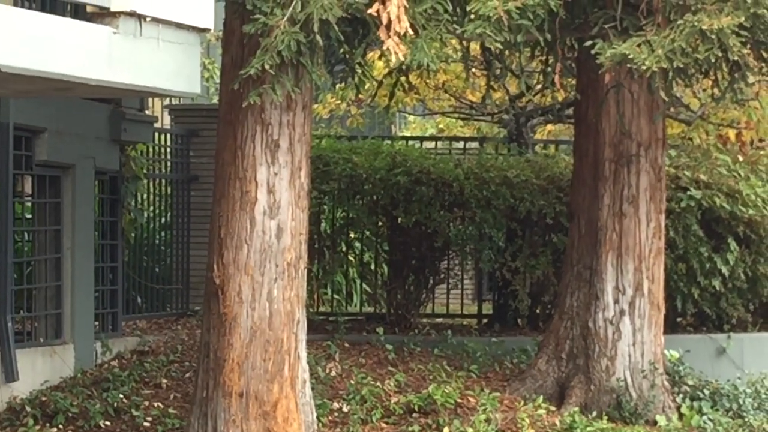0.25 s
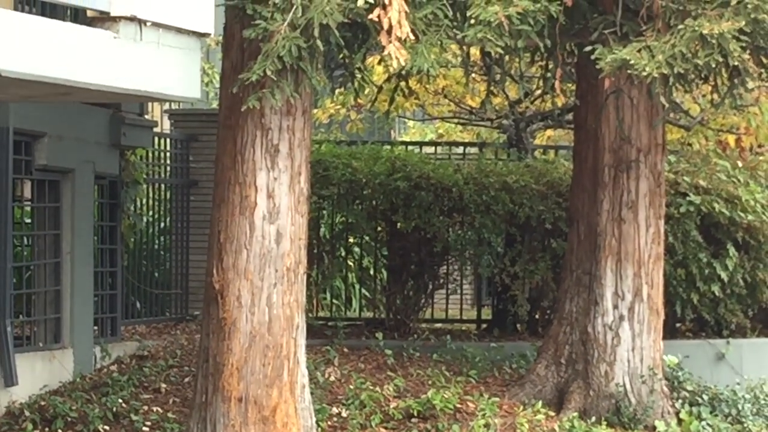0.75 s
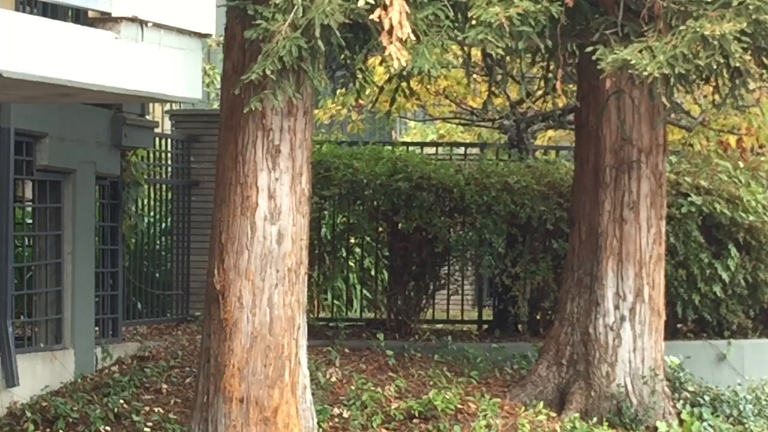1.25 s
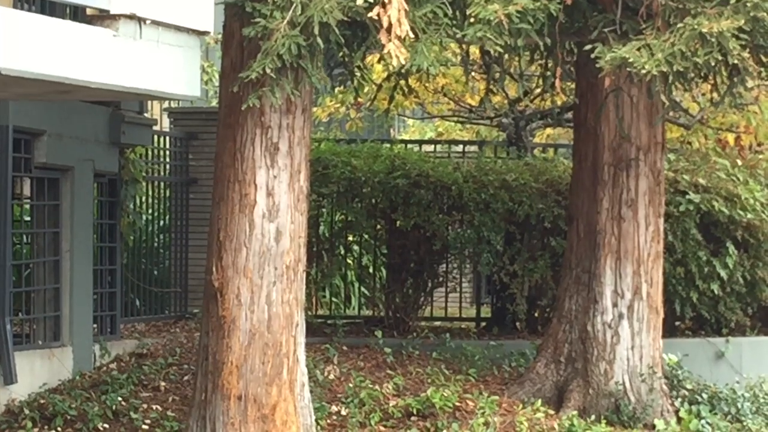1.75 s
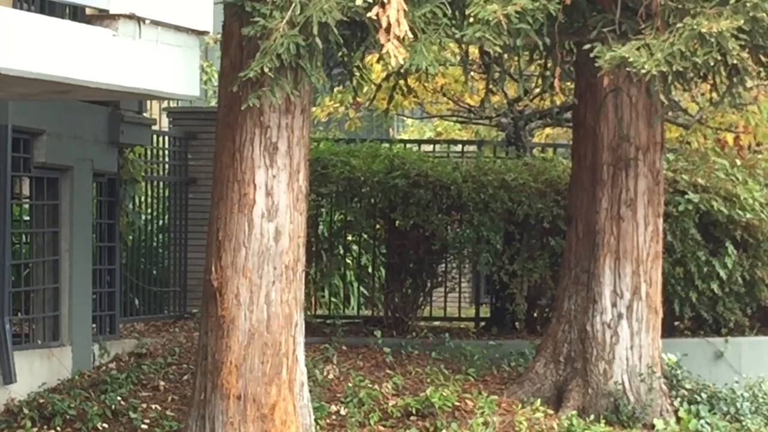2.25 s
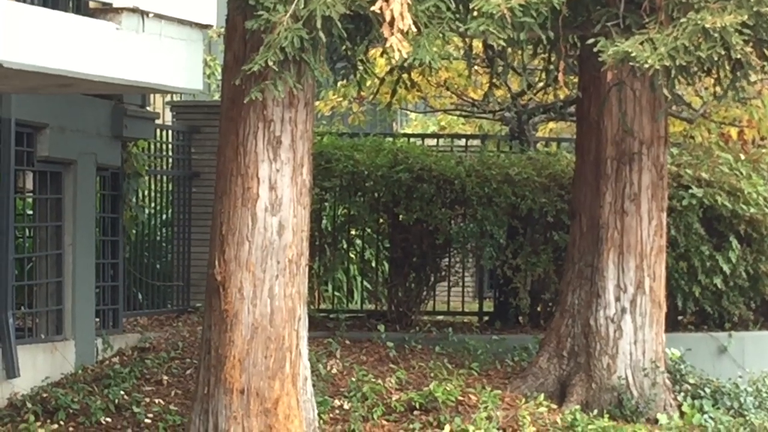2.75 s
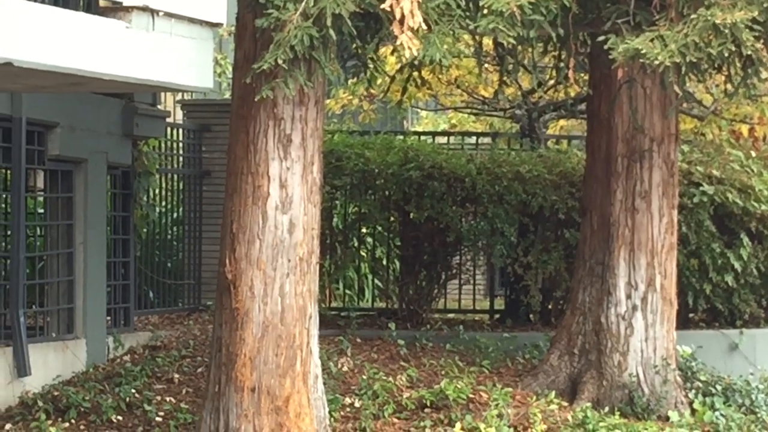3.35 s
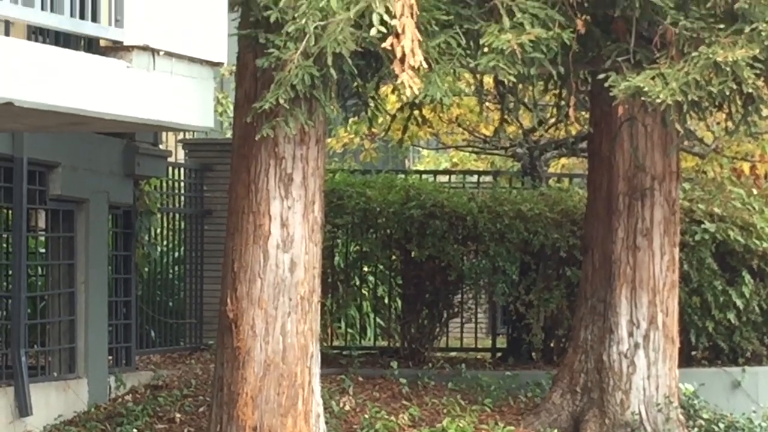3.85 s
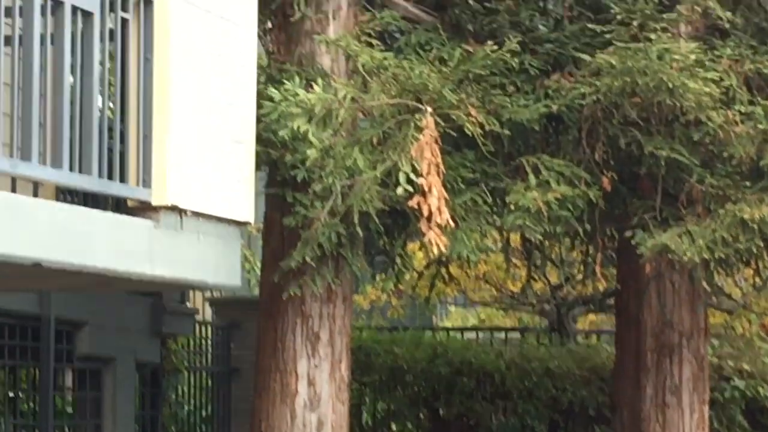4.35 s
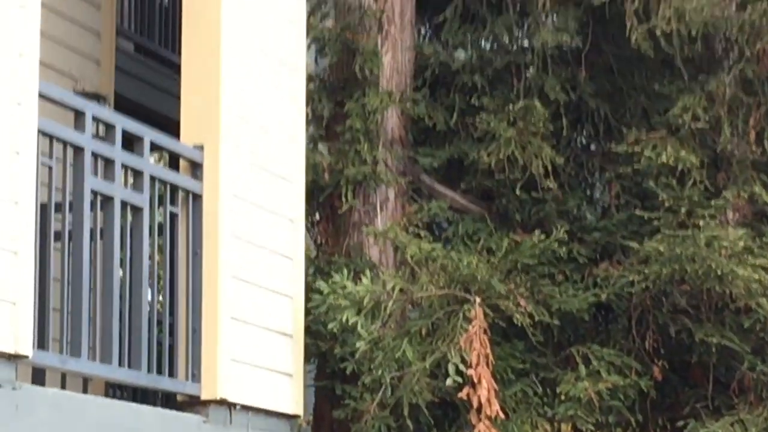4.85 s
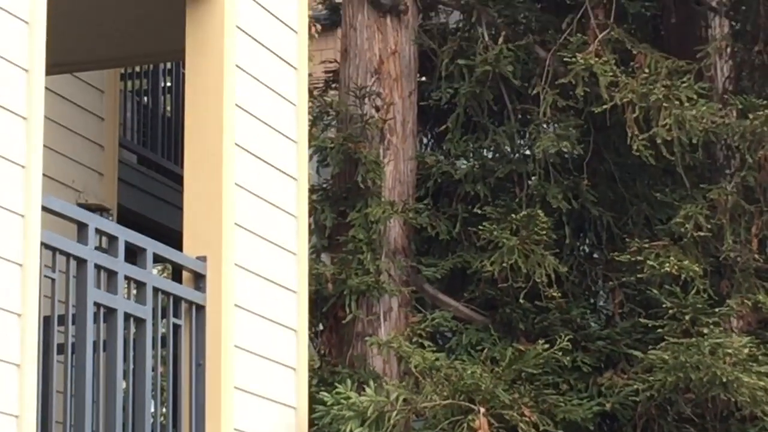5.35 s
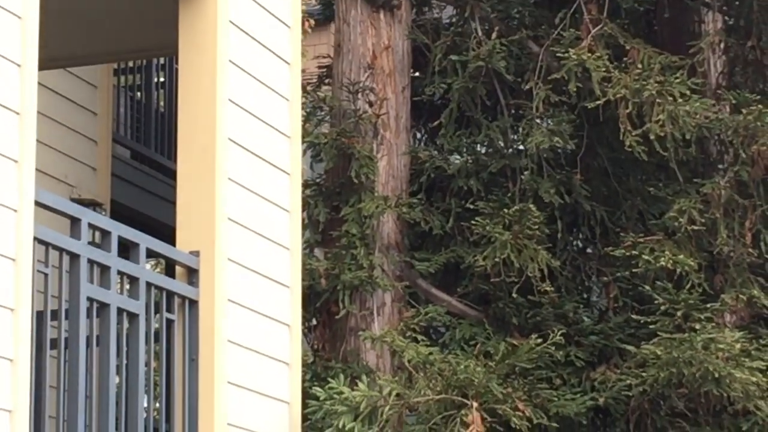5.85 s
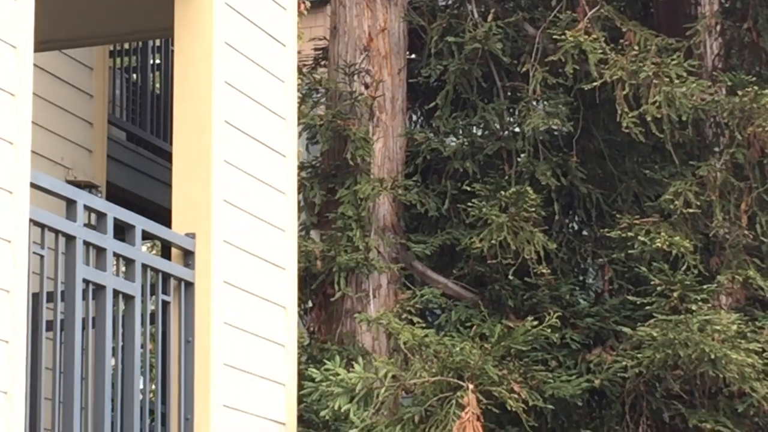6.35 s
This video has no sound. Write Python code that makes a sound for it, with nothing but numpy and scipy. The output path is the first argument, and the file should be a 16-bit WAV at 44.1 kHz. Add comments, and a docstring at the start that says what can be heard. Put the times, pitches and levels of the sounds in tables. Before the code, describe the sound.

In a courtyard with trees and house walls, low distant traffic and a fan's hum run throughout. A squirrel in a conifer gives two quick, breathy chucks, then three louder, long rasping barks about a second apart, then after a pause four more clipped chucks. A small bird calls thinly twice, faintly. The microphone is a modest distance away, with a short echo from branches and walls.

```python
"""Low traffic rumble and a fan's hum are heard at once and run throughout, while a squirrel scolds from a
conifer in a courtyard: two clipped, breathy barks, three long rasping ones, then four more clipped ones,
all made by pulses and puffs of air shaped by a mouth. A small bird, made of gliding tones, calls twice.
Random bursts that die away make the short echo of branches and house walls."""
import sys
import numpy as np
from scipy import signal
from scipy.fft import rfft, irfft, next_fast_len
from scipy.io import wavfile

SR = 44100
rng = np.random.default_rng(int(sys.argv[2]) if len(sys.argv) > 2 else 0)


def store_pcm(level_fs):
    """Save levels as 16-bit WAV."""
    pcm = np.round(np.clip(level_fs, -1, 1) * 32767).astype(np.int16)
    wavfile.write(sys.argv[1], SR, np.atleast_2d(pcm).T)


N = 291060
TIME = np.arange(N) / SR

# the long barks; the hiss has its own level, the clear start and squeal add to level_db:
# start_s, length_s, level_db, top_pitch_hz, roughness_factor, hiss_db, clear_start_db, squeal_db
LONG_BARKS = [(1.335, .440, -47, 783.3, 1.4, -63, -4.5, -3.5), (2.355, 0.41, -46.5, 807, 1.14, -70, -3, -1),
              (3.459, 0.41, -47, 792.4, 1.19, -71, -4.5, 2.5)]
# broad tone colour of the wide-open mouth: frequency_hz, level_db
WIDE_MOUTH = [(300, -30), (600, -21.5), (780, -31), (950, -11.5), (1350, -8.5), (1600, -2.5), (1850, 0),
              (2500, -2), (3150, 1), (3500, -13), (4100, -17.5), (5200, -30), (6300, -18.5), (8400, -9),
              (9700, -21.5), (11000, -43.5)]
# strain rises quickly, then eases; pitch and rasp follow it
START_HZ, STRAIN_RISE_S, STRAIN_HOLD_S, EASE_PER_S = 534.1, 0.17, 0.00516, 2.5
ROUGH_SLACK, ROUGH_STRAINED = 0.23, 0.509  # before each bark's roughness factor
# force swells, sags and dies away
LONG_ATTACK_S, LONG_ATTACK_DB, LONG_SAG_DB_PER_S = 0.027, 9, 2
LONG_RELEASE_S, LONG_RELEASE_DB = 0.039, 9.5
# the mouth opens with a bright snap and a brief squeal, narrows slowly and shuts at the end
SNAP_S, SNAP_TREBLE_DB, SNAP_SQUEAL_DB, SNAP_HZ, SNAP_WIDTH_HZ = 0.023, 3, 2, 3630, 570
NARROWING_DB_PER_S, SHUT_S, SHUT_TREBLE_DB = 17, 0.082, 7
# the throat rings at first; the squeal climbs as the mouth shuts
THROAT_HZ, THROAT_WIDTH_HZ, THROAT_DB, THROAT_FADE_DB_PER_S = 1845, 150, -5.5, 27
SQUEAL_HZ, SQUEAL_CLIMB_HZ, SQUEAL_WIDTH_HZ, SQUEAL_S = 2960, 566, 740, 0.13
# the top hiss builds up and fades
HISS_BUILD_S, HISS_BUILD_DB, HISS_FADE_DB_PER_S = 0.1, 27, 94
# the clear start is short; a thread of second harmonic emerges from the rasp
CLEAR_S, THREAD_DB, THREAD_BUILD_S = 0.078, -5, 0.3


def long_barks(first_db=-10.5, second_db=1.5):
    """A clear start rises in pitch, breaks into a rasp, sinks and ends in a squeal as the mouth closes."""
    out = np.zeros(N)
    for onset, length, level_db, top_hz, rough_factor, hiss_db, start_db, end_db in LONG_BARKS:
        t = TIME[:int(length * SR)]
        easing = EASE_PER_S * np.maximum(t - STRAIN_RISE_S - STRAIN_HOLD_S, 0)
        strain = np.sin(np.pi / 2 * ramp(t, STRAIN_RISE_S)) - easing
        snap = np.exp(-t / SNAP_S)
        shut = ramp(t - length + SHUT_S, SHUT_S)

        pitch = START_HZ + (top_hz - START_HZ) * strain
        rough = rough_factor * (ROUGH_SLACK + (ROUGH_STRAINED - ROUGH_SLACK) * strain)
        source, phase = folds(pitch, rough, jitter=0.036, shimmer_db=1.6, air=0.68, soft_hz=5000)

        treble_db = SNAP_TREBLE_DB * snap - NARROWING_DB_PER_S * t - SHUT_TREBLE_DB * shut
        voice = brighten(rms_one(colour(source, WIDE_MOUTH)), treble_db)
        opening = from_db(SNAP_SQUEAL_DB) * snap * resonance(source, SNAP_HZ, SNAP_WIDTH_HZ)

        throat_gain = from_db(THROAT_DB + start_db - THROAT_FADE_DB_PER_S * t)
        throat = throat_gain * resonance(source, THROAT_HZ, THROAT_WIDTH_HZ)

        squeal_gain = from_db(end_db) * ramp(t - length + SQUEAL_S, SQUEAL_S)
        squeal_hz = SQUEAL_HZ + SQUEAL_CLIMB_HZ * shut ** 2
        squeal = squeal_gain * resonance(source, squeal_hz, SQUEAL_WIDTH_HZ)

        build_loss_db = HISS_BUILD_DB * (1 - ramp(t, HISS_BUILD_S))
        fade_loss_db = HISS_FADE_DB_PER_S * np.maximum(t - HISS_BUILD_S, 0)
        hiss_gain = from_db(hiss_db - build_loss_db - fade_loss_db)
        hiss = hiss_gain * rms_one(band(source, low_hz=9700, high_hz=11500))

        # the three lowest harmonics ring at the start
        first = from_db(first_db) * np.sin(phase)
        second = from_db(second_db) * np.sin(2 * phase)
        third = np.sin(3 * phase)
        clear = from_db(start_db) * (1 - ramp(t, CLEAR_S) ** 4) * (first + second + third)
        # the second harmonic runs on through the rasp and fades as the mouth closes
        thread = from_db(THREAD_DB) * np.sin(2 * phase) * ramp(t, THREAD_BUILD_S) * (1 - shut)
        tremble = from_db(1.3 * drift(70, len(t)))
        tones = (clear + thread) * tremble

        bark = from_db(level_db) * (voice + opening + throat + squeal + tones) + hiss
        force = swell(t, LONG_ATTACK_S, LONG_ATTACK_DB, LONG_RELEASE_S, LONG_RELEASE_DB)
        force = force * from_db(-LONG_SAG_DB_PER_S * t)
        add(out, onset, bark * force * signal.windows.tukey(len(t), 0.025))
    return out


# the clipped barks; treble_db and puff_db add to level_db, and treble_db sets the rushing air and hiss:
# start_s, length_s, level_db, treble_db, puff_db
SHORT_BARKS = [(0.239, 0.085, -55, -2, -17), (0.453, 0.073, -58.5, 2.5, -17), (5.249, 0.079, -55, -0.5, -7),
               (5.581, 0.081, -56.5, -1, -16), (5.923, .080, -58.5, 1, 0.5), (6.361, 0.079, -57.5, 0, -4)]
# broad tone colour of the half-open mouth: frequency_hz, level_db
HALF_OPEN_MOUTH = [(300, -4.5), (600, -20.5), (850, -6), (1250, -9), (1500, 1), (1900, 3.5), (2600, -1.5),
                   (3100, -11), (3600, -19.5), (5200, -38), (15500, -42)]
# broad tone colour of air rushing past the teeth: frequency_hz, level_db
TEETH_AIR = [(400, -0.5), (1500, 0), (3500, -5.5), (5200, -7.5), (7400, 0.5), (9200, -0.5), (11000, -17),
             (15500, -20)]
# one push of air: pitch climbs with it and the voice gets less rough
CHUCK_START_HZ, CHUCK_TOP_HZ, CHUCK_PEAK_SHARE = 490.3, 631.5, 0.68  # the peak is a share of the length
CHUCK_ROUGH, CHUCK_CLEARING = 0.96, 0.3
CHUCK_ATTACK_S, CHUCK_ATTACK_DB, CHUCK_RELEASE_S, CHUCK_RELEASE_DB = 0.031, 28, 0.0085, 4
AIR_DB, AIR_ATTACK_S, AIR_ATTACK_DB, AIR_RELEASE_S, AIR_RELEASE_DB = -2.5, 0.032, 16, 0.023, 14
CHUCK_HISS_DB = -16


def short_barks(puff_s=0.0062):
    """A puff and rushing air come first, then a hoarse, barely voiced chuck that outlasts them."""
    out = np.zeros(N)
    for onset, length, level_db, treble_db, puff_db in SHORT_BARKS:
        t = TIME[:int(length * SR)]
        push = np.sin(np.pi / 2 * t / (CHUCK_PEAK_SHARE * length)) ** 2
        pitch = CHUCK_START_HZ + (CHUCK_TOP_HZ - CHUCK_START_HZ) * push
        rough = CHUCK_ROUGH - CHUCK_CLEARING * push
        source, _ = folds(pitch, rough, jitter=0.05, shimmer_db=1.8, air=0.65, soft_hz=4000)

        voice_force = swell(t, CHUCK_ATTACK_S, CHUCK_ATTACK_DB, CHUCK_RELEASE_S, CHUCK_RELEASE_DB)
        voice = voice_force * rms_one(colour(source, HALF_OPEN_MOUTH))

        rush = rng.standard_normal(len(t))
        air_force = swell(t, AIR_ATTACK_S, AIR_ATTACK_DB, AIR_RELEASE_S, AIR_RELEASE_DB)
        air = from_db(AIR_DB) * air_force * rms_one(colour(rush, TEETH_AIR))
        hiss = from_db(CHUCK_HISS_DB) * push * rms_one(band(source, low_hz=10700, high_hz=12400))
        puff = from_db(puff_db) * rms_one(band(rush, low_hz=3800, high_hz=7500)) * np.exp(-t / puff_s)

        bark = voice + puff + from_db(treble_db) * (air + hiss)
        add(out, onset, bark * from_db(level_db) * signal.windows.tukey(len(t), 0.07))
    return out


def folds(pitch_hz, rough, jitter, shimmer_db, air, soft_hz):
    """Vocal folds: one soft pulse a cycle; roughness upsets timing and strength and lets puffs through."""
    size = len(pitch_hz)
    rough = np.clip(rough, 0, 1)
    shaken_hz = pitch_hz * (1 + jitter * rough * drift(319, size))
    phase = 2 * np.pi * np.cumsum(shaken_hz) / SR
    pulses = sum(np.cos(k * phase) / (1 + (k * pitch_hz / soft_hz) ** 2) for k in range(1, 21))
    pulses *= np.sqrt(4 * pitch_hz / SR)
    puffs = rms_one(rng.standard_normal(size) * (1 + 1.2 * np.cos(phase)))
    # extra airy treble stays, even where the low harmonics are clear
    low_puffs = low_part(puffs, soft_hz)
    noisy = np.clip(air * rough, 0, 1)
    flow = np.sqrt(1 - noisy) * pulses + np.sqrt(noisy) * low_puffs + 1.21 * (puffs - low_puffs)
    return flow * from_db(shimmer_db * rough * drift(270, size)), phase


def resonance(x, centre_hz, width_hz):
    """A steep resonance whose centre may glide: shift it to 0 Hz, low-pass, shift back; rms 1."""
    turn = np.exp(2j * np.pi * np.cumsum(centre_hz * np.ones(len(x))) / SR)
    low_pass = signal.butter(2, width_hz / 2, fs=SR, output="sos")
    return rms_one(np.real(turn * signal.sosfilt(low_pass, x / turn)))


def brighten(x, treble_db, split_hz=4800):
    """Raise or lower the treble above the split frequency."""
    low = low_part(x, split_hz)
    return low + from_db(treble_db) * (x - low)


# the bird's thin whistle, in falling slurs: start_s, length_s, from_pitch_hz, to_pitch_hz, level_db
SLURS = [(2.769, 0.097, 8600, 7750, -68.5), (2.849, 0.031, 8900, 7830, -63)]
# the bird's buzzy chips: start_s, length_s, pitch_hz, level_db
CHIPS = [(6.259, 0.077, 6810, -62), (6.399, 0.052, 6850, -64)]


def birds(slur_s=0.016, scoop_hz=1500, scoop_s=0.013):
    """Slurs slide down and settle; chips scoop up into a buzz made by fast pitch wavering."""
    out = np.zeros(N)
    for onset, length, from_hz, to_hz, level_db in SLURS:
        pitch = to_hz + (from_hz - to_hz) * np.exp(-TIME[:int(length * SR)] / slur_s)
        whistle = note(pitch, waver=0.01, waver_rate_hz=360, taper=0.25)
        add(out, onset, from_db(level_db) * whistle)
    for onset, length, pitch_hz, level_db in CHIPS:
        pitch = pitch_hz - scoop_hz * np.exp(-TIME[:int(length * SR)] / scoop_s)
        chip = note(pitch, waver=0.084, waver_rate_hz=730, taper=0.68)
        add(out, onset, from_db(level_db) * chip)
    return out


def note(pitch_hz, waver, waver_rate_hz, taper):
    """A single gliding tone whose pitch trembles; waver is a fraction of the pitch."""
    size = len(pitch_hz)
    shaken_hz = pitch_hz * (1 + waver * drift(waver_rate_hz, size))
    phase = 2 * np.pi * np.cumsum(shaken_hz) / SR
    return np.sqrt(2) * np.sin(phase) * signal.windows.tukey(size, taper)


# very short reflections of the long and the clipped barks: delay_s, level_db
LONG_ECHOES = [(.00163, -6), (.00195, -14.5), (.00372, -15), (.00545, -13.5)]
SHORT_ECHOES = [(.001655, -4.5), (.00294, -7), (.00372, -14)]
# peaks and dips that the short path through the branches leaves on the direct sound of the long
# and the clipped barks: frequency_hz, width_hz, height_db
LONG_PEAKS = [(1138, 83, 7.5), (1170, 130, -14.5), (1380, 25, 14), (2230, 320, -10.5), (2615, 150, 8.5),
              (3050, 81, -17), (3120, 290, -1.5), (3900, 180, -16), (4480, 23, 9.5), (6000, 200, 3.5),
              (6240, 110, 1), (7700, 120, -6), (8080, 150, 2.5)]
SHORT_PEAKS = [(1144, 91, 7), (1570, 90, -22), (2040, 220, 4.5), (2310, 125, -20), (2640, 110, 11),
               (3150, 54, 13.5), (7190, 86, 7.5), (8170, 230, -21), (9290, 98, -8)]


def near_surfaces(x, echoes, peaks, size=1024):
    """The direct sound plus a few very short reflections, which strengthen some pitches and weaken others."""
    n = np.arange(size)
    paths = np.sinc(n) + sum(from_db(db) * np.sinc(n - delay * SR) for delay, db in echoes)
    flat = [(1, 0), (SR, 0)]
    return signal.oaconvolve(x, colour(paths, flat, peaks))[:N]


# courtyard reverberation: frequency_hz, time_to_fall_60_db_s, level_db
YARD = [(704, 0.17, -1.5), (1880, 0.63, -8), (3480, 0.7, -12.5), (7500, 0.3, -13), (14000, 0.22, -28)]


def courtyard(x, build_s=0.0031):
    """Branches scatter at once, house walls a little later; the diffuse tail fades at its own pace per band."""
    t = TIME[:SR]
    response = np.zeros(SR)
    edges = np.geomspace(350, 16000, 11)
    for low, high in zip(edges, edges[1:]):
        t60, db = along(YARD, np.sqrt(low * high))
        fade = from_db(-60 * t / t60) * (1 - np.exp(-t / build_s))
        response += from_db(db) * band(rng.standard_normal(SR), low, high) * fade / np.linalg.norm(fade)
    branches = scatter(x, level_db=-9.0, t60=0.26, low_hz=2630, high_hz=13200, start_s=0.0027)
    walls = scatter(x, level_db=-3.0, t60=0.064, low_hz=1510, high_hz=3340, start_s=0.027)
    return signal.fftconvolve(x, response)[:N] + branches + walls


def scatter(x, level_db, t60, low_hz, high_hz, start_s):
    """A dense, short burst of reflections: noise that falls 60 dB in t60 seconds."""
    t = TIME[:SR // 4]
    fading_noise = rng.standard_normal(len(t)) * from_db(-60 * t / t60)
    burst = band(fading_noise * (t > start_s), low_hz, high_hz)
    gain = from_db(level_db) * np.sqrt(2 * (high_hz - low_hz) / SR) / np.linalg.norm(burst)
    return signal.fftconvolve(x, gain * burst)[:N]


# tone colour of distant traffic: frequency_hz, relative level_db (per Hz)
TRAFFIC = [(20, -35), (38, -13.5), (55, 0), (90, 3.5), (140, -1), (180, -9), (270, -14.5), (450, -26.5),
           (800, -27.5), (1100, -29), (2000, -36), (4000, -43.5), (9000, -49), (15500, -54)]
# fan and motor hum, each line's pitch wandering by the third column:
# frequency_hz, level_db, wander_hz
HUM = [(119.2, -55, 2.63), (482, -88, 2.2), (990, -79.5, 2.99)]


def background(traffic_db=-50.5, rumble_swell_db=1.5, drone_swell_db=2.0, swell_rate_hz=4.3, split_hz=130):
    """Traffic is filtered noise whose rumble and drone swell separately; the fan is wavering tones."""
    traffic_filter = colour(signal.unit_impulse(SR // 4), TRAFFIC)
    noise = rng.standard_normal(N + SR)
    traffic = from_db(traffic_db) * rms_one(signal.oaconvolve(noise, traffic_filter)[SR:SR + N])
    rumble = low_part(traffic, split_hz)
    bass = low_part(traffic, 380)
    swelling_rumble = rumble * from_db(rumble_swell_db * drift(swell_rate_hz, N))
    swelling_drone = (bass - rumble) * from_db(drone_swell_db * drift(swell_rate_hz, N))
    hum = np.zeros(N)
    for hz, level_db, wander_hz in HUM:
        phase = 2 * np.pi * np.cumsum(hz + wander_hz * drift(6.87, N)) / SR
        hum += from_db(level_db) * np.sqrt(2) * np.sin(phase)
    return swelling_rumble + swelling_drone + (traffic - bass) + hum


def from_db(db):
    """Decibels to gain."""
    return 10 ** (np.asarray(db) / 20)


def rms_one(x):
    """Scale to an rms (average strength) of 1."""
    return x / np.sqrt(np.mean(x ** 2) + 1e-20)


def ramp(t, length_s):
    """From 0 to 1 in the given time."""
    return np.clip(t / length_s, 0, 1)


def swell(t, attack_s, attack_db, release_s, release_db):
    """Attack, hold and release, as a gain."""
    attack_loss_db = attack_db * (1 - ramp(t, attack_s)) ** 2
    release_loss_db = release_db * (1 - ramp(t[-1] - t, release_s))
    return from_db(-attack_loss_db - release_loss_db)


def drift(rate_hz, size):
    """Smooth random wandering with rms 1: noise through a two-pole low-pass."""
    r = np.exp(-2 * np.pi * rate_hz / SR)
    return rms_one(signal.lfilter([1], [1, -2 * r, r * r], rng.standard_normal(size + SR))[SR:])


def along(rows, at):
    """Each column of a table, read along its first."""
    first, *columns = np.transpose(rows)
    return [np.interp(at, first, c) for c in columns]


def low_part(x, split_hz):
    """The part below the split, with no delay because the filter runs both ways."""
    return signal.sosfiltfilt(signal.butter(2, split_hz, fs=SR, output="sos"), x)


def band(x, low_hz, high_hz):
    """Keep the frequencies between two limits (Butterworth band-pass)."""
    return signal.sosfilt(signal.butter(2, [low_hz, min(high_hz, 0.45 * SR)], "band", fs=SR, output="sos"), x)


def colour(x, spectrum, peaks=()):
    """Causal (minimum-phase) filter from a broad spectrum and narrow peaks and dips."""
    size = 2 * next_fast_len(len(x))
    hz = np.maximum(np.arange(size // 2 + 1) * SR / size, 1)
    points_hz, points_db = np.transpose(spectrum)
    db = np.interp(np.log(hz), np.log(points_hz), points_db)
    for centre, width, height in peaks:
        db = db + height / (1 + (2 * (hz - centre) / width) ** 2)
    # folding the cepstrum (spectrum of the log spectrum) makes the filter respond only after its input
    cepstrum = irfft(np.log(from_db(db)))
    cepstrum[1:size // 2] *= 2
    cepstrum[size // 2 + 1:] = 0
    return irfft(rfft(x, size) * np.exp(rfft(cepstrum)))[:len(x)]


def add(out, onset, sound):
    """Place a sound at its time in seconds."""
    start = int(onset * SR)
    out[start:start + len(sound)] += sound[:N - start]


def scene(bird_wet_db=6.0):
    """Squirrel and bird in the courtyard, over the traffic and fan; the bird feeds the echo more strongly."""
    rasps, chucks, calls = long_barks(), short_barks(), birds()
    direct_rasps = near_surfaces(rasps, LONG_ECHOES, LONG_PEAKS)
    direct_chucks = near_surfaces(chucks, SHORT_ECHOES, SHORT_PEAKS)
    echo = courtyard(rasps + chucks + from_db(bird_wet_db) * calls)
    return (direct_rasps + direct_chucks + calls + echo + background())[None]


def record(dry, cutoff_hz=15720):
    """The top is cut steeply by an elliptic low-pass."""
    return signal.sosfilt(signal.ellip(12, 0.1, 70, cutoff_hz, fs=SR, output="sos"), dry)


dry = scene()
out = record(dry)
store_pcm(out)
```